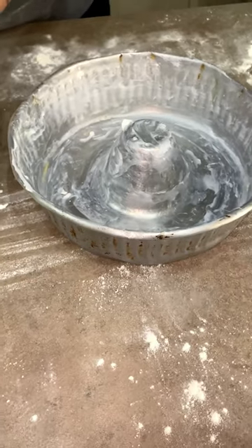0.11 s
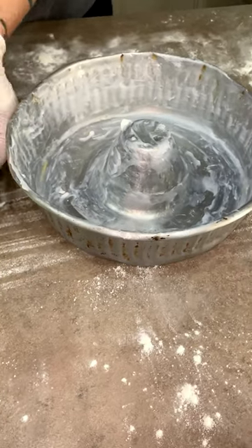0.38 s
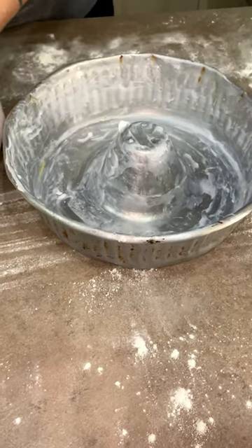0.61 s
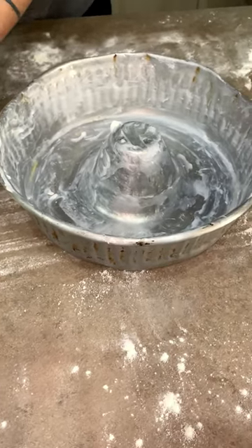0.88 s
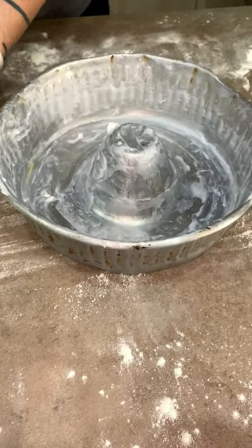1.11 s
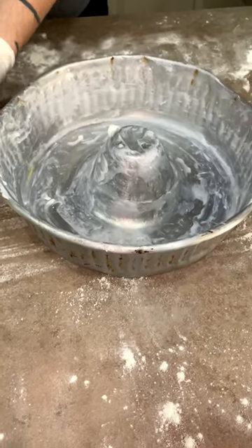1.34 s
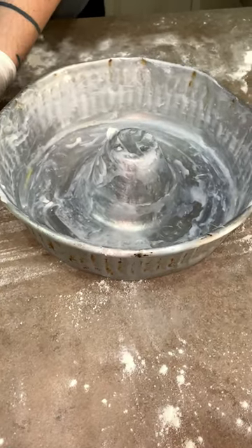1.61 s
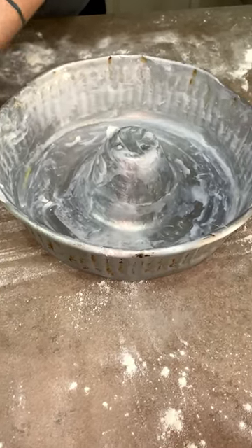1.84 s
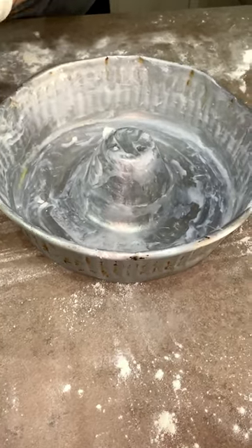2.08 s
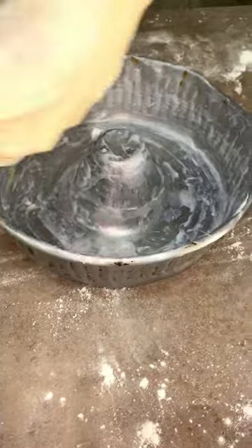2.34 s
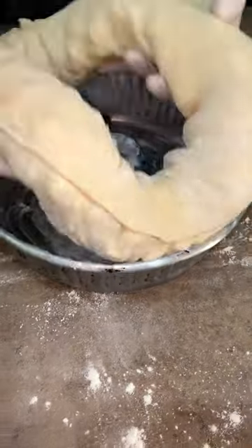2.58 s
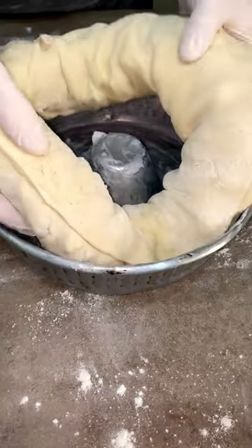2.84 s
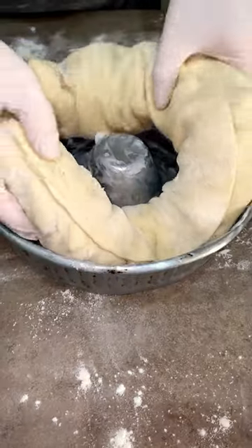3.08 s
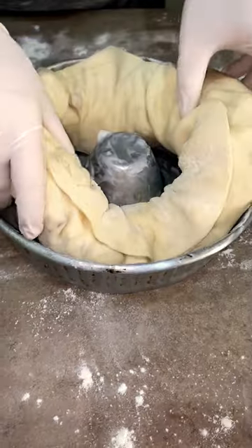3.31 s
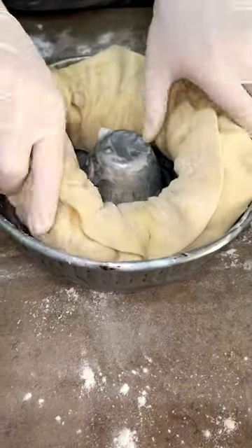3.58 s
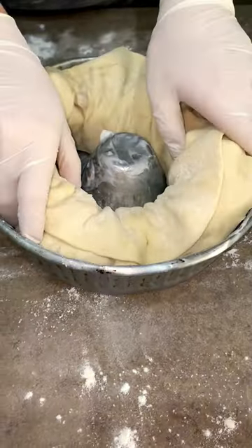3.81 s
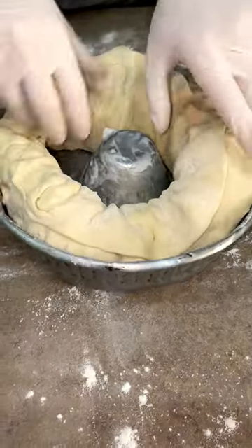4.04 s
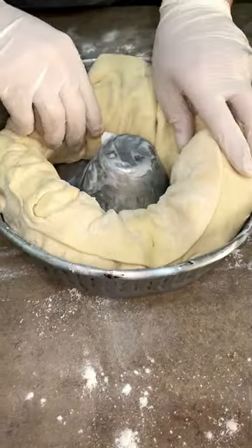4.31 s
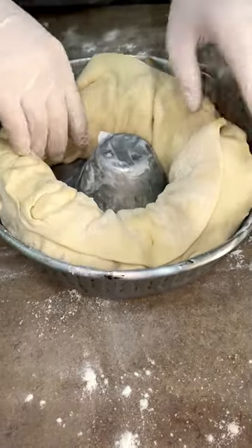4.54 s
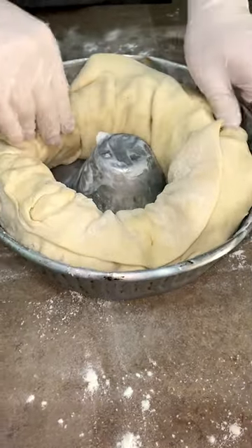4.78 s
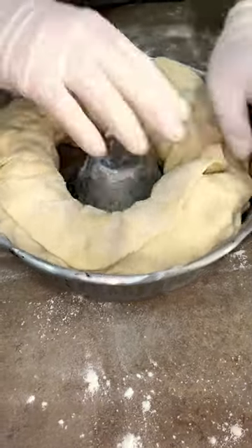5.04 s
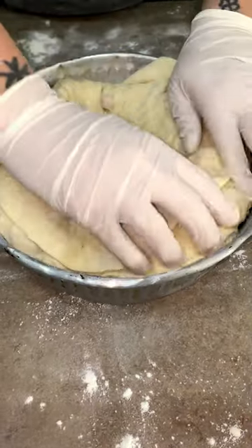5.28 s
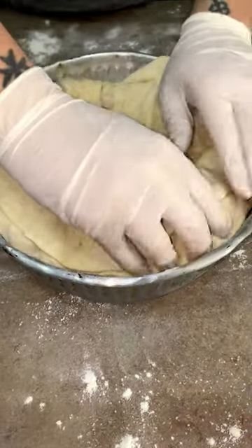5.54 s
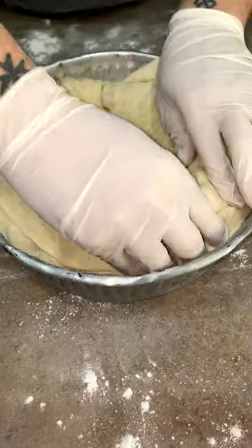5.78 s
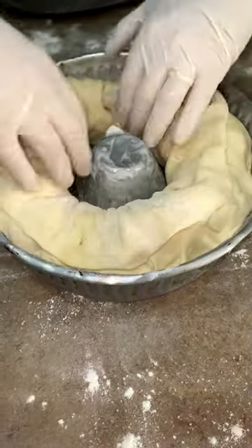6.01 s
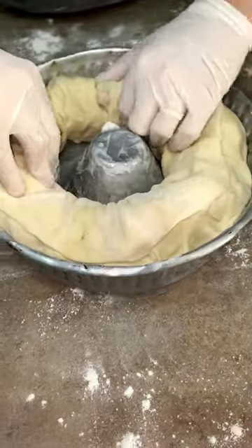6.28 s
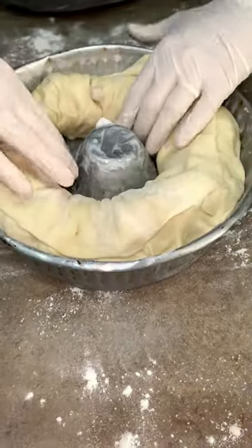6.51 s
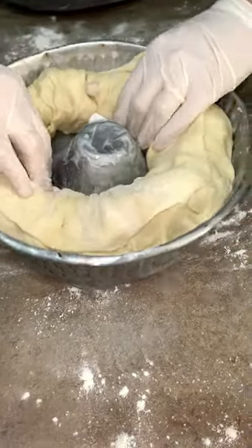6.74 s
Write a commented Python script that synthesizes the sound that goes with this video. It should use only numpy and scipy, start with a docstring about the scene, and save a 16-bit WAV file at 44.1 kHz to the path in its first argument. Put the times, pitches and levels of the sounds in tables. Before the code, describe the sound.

A small kitchen, heard closely in stereo, with a steady low appliance hum that throbs gently about twice a second. From 0 to 2 seconds gloves rustle softly on flour and dough, with dull bumps, deep table jolts and a couple of faint rubber clicks. Around 2 to 2.6 it nearly falls quiet. At 2.65 a rapid cluster of knocks peaks in a hollow, dry metallic clunk as dough drops into the thin mould, the loudest moment, with a scrape at 2.7. From 2.9 to 4.8 come short rubs, glove snaps, a tiny low creak near 3.3, and damped knocks at 3.5, 4.25 and 4.75. A strong dragging scuff swells at 5.0. Brighter tinny knocks follow at 5.4, 5.6 and 5.9, with rubbery clicks until 6.3. Quiet rubbing and faint taps continue to nearly 6.9. Hits leave a short room tail.

```python
"""Dull thumps and rustling gloves come first, over an appliance hum in a small kitchen, near a stereo microphone.
A dough ring is lifted off a floured table, dropped into a thin metal mould and pressed in by gloved hands.
Knocks are dying modes of mould and table top; gloves, flour and dragged dough are shaped noise that swells
with each stroke; glove snaps are short clicks, jolts are deep sways, and a short room tail follows the hits."""
import sys
import numpy as np
from scipy import signal
from scipy.fft import rfft, irfft
from scipy.io import wavfile
from scipy.ndimage import uniform_filter1d

SR = 44100
rng = np.random.default_rng(int(sys.argv[2]) if len(sys.argv) > 2 else 0)


def wrap_up_sound(samples):
    """Save the sound to the file named by the first command line argument, as 16-bit audio."""
    columns = np.atleast_2d(samples).T
    # keep every value between -1 and 1, then stretch to whole-number steps
    tamed = np.clip(columns, -1, 1)
    steps = np.round(tamed * 32767).astype(np.int16)
    wavfile.write(sys.argv[1], SR, steps)


def nominal_scale(level):
    """Amplitude ratio for a level in decibels (scalar or array-like)."""
    x = np.asarray(level, float) / 20
    return 10 ** x


N = 303408

# Still kitchen air, relative spectrum: (frequency [Hz], density [dB per Hz])
AIR_SPECTRUM = [(12, -52), (20, -20.5), (37, -31.5), (69, -19), (92, -3), (124, -20), (154, -4),
                (270, -6.5), (309, -3.5), (353, -13.5), (572, -12.5), (1310, -32.5), (12200, -70),
                (15800, -100), (22000, -120)]
# Appliance hum tones: (frequency [Hz], level before a 2 dB lift and the wavering [dB])
HUM_TONES = [(48.4, -68.5), (150.7, -65), (306.8, -67), (409.1, -76.5), (559.9, -78.5)]
# Likeness of the noise at the two microphones: (frequency [Hz], correlation [-1 to 1])
STEREO_LIKENESS = [(60, 0.99), (110, 0.74), (190, 1), (350, 0.8), (630, 0.22), (1120, 0.37), (2020, 0.72),
                   (3630, -0.21), (6530, 0.65), (11700, -0.85)]
# Side lean of the noise layers: (frequency [Hz], left minus right [dB])
NOISE_LEAN = [(60, 2.5), (170, 3), (500, 3.5), (1420, 1.5), (4080, -2.5), (11700, 1.5)]
# Decay of the room tail: (frequency [Hz], t60 [s])
ROOM_DECAY = [(150, 0.61), (500, 0.35), (1500, 0.23), (4000, 0.25), (10000, 0.25)]

# Jolts that shake the whole table: (time [s], level before doubling, onset and decay [dB])
JOLTS = [(0.568, -46), (0.899, -46), (1.229, -46), (1.561, -39), (2.674, -42.5), (3.013, -47.5),
         (4.234, -44.5), (4.599, -50), (4.767, -39.5), (5.079, -43), (5.359, -56), (5.651, -41),
         (5.929, -44), (6.169, -49), (6.299, -52.5)]
# The table frame's three lowest sways: (frequency [Hz])
FRAME_SWAYS_HZ = [44.6, 61.8, 79.9]
# A short low creak: (time [s], level [dB])
CREAK_LEVEL = [(3.245, -51), (3.26, -47.5), (3.295, -49.5), (3.316, -66)]

# Hand strokes over flour, dough and metal, levels before texture and resonance:
# (peak time [s], length [s], airy swish [dB], scrape [dB], drag on the mould [dB])
STROKES = [(0.052, 0.25, -68, -67, -66), (0.145, 0.35, -67.5, -70, -64), (0.346, 0.17, -57, -60, -61.5),
           (0.588, 0.2, -60, -60.5, -60), (0.726, 0.12, -57.5, -60, -58), (0.89, 0.11, -59.5, -60.5, -56.5),
           (1.058, 0.35, -60.5, -66.5, -62.5), (1.14, 0.05, -65, -58, -65.5),
           (1.25, 0.15, -71.5, -63.5, -56), (1.432, 0.13, -61, -63, -61),
           (1.574, 0.137, -64.0, -64.0, -57.5), (1.703, 0.16, -59.5, -64, -63.5),
           (1.834, 0.27, -65.5, -62, -66.5), (1.986, 0.075, -67.5, -63, -70),
           (2.232, 0.16, -81.0, -71.5, -61), (2.722, 0.1, -61.5, -48.5, -45),
           (2.809, 0.25, -67.5, -60.5, -50), (2.958, 0.063, -59, -58.5, -57),
           (3.046, 0.047, -65, -55.5, -64), (3.132, 0.031, -64.5, -56, -55.5),
           (3.246, 0.277, -63.5, -58.5, -55.5), (3.383, 0.086, -60, -59, -67),
           (3.492, 0.077, -68, -63.5, -73), (3.546, 0.065, -61, -60, -55), (3.65, 0.36, -64, -63, -58),
           (3.88, 0.09, -62.0, -55.5, -53.5), (4.045, 0.086, -58, -57.5, -52.5),
           (4.156, 0.062, -73.5, -74, -68), (4.236, 0.037, -61.5, -61, -60),
           (4.345, 0.18, -67.0, -61.5, -54), (4.611, 0.18, -65.5, -63.0, -60),
           (4.684, 0.072, -78, -63.5, -55.5), (4.83, 0.064, -66.5, -63, -60), (5.027, 0.17, -54, -49, -39),
           (5.21, 0.23, -66.5, -62.5, -63.5), (5.368, 0.033, -60, -54, -62),
           (5.422, 0.14, -65.5, -66.5, -51), (5.565, 0.083, -60.5, -58.5, -54),
           (5.667, 0.12, -66.5, -65, -56.5), (5.78, 0.091, -70.5, -65, -60.5),
           (5.925, 0.035, -53, -53.5, -72), (5.96, 0.14, -69.5, -66.5, -54.5),
           (6.086, 0.11, -69.5, -67, -61.5), (6.196, 0.079, -66.5, -66.5, -58),
           (6.357, 0.41, -67.5, -64, -61.5), (6.467, 0.047, -69, -61, -63), (6.53, 0.13, -67, -69, -73),
           (6.812, 0.18, -66.5, -60.5, -59.5), (6.868, 0.057, -66.5, -59.0, -54.5)]
# Levels between strokes: (swish [dB], scrape [dB], drag [dB])
STILL_DB = [-89, -88, -73]
# Weight of the hands on the table, as rumble before the drag adds its share: (time [s], level [dB])
HAND_WEIGHT = [(0.0, -56), (0.19, -64), (0.94, -60.5), (1.07, -56.5), (1.86, -61), (2.09, -74), (2.3, -75),
               (2.72, -63), (3.68, -63.5), (4.46, -58.5), (4.66, -57), (4.92, -63), (5.36, -59.5),
               (5.52, -60.5), (5.82, -58), (5.96, -61.5), (6.59, -60.5), (6.88, -60.5)]
# Resonance of the hollow under the hand: (time [s], frequency [Hz])
HAND_HOLLOW = [(0, 2450), (2.0, 2400), (2.7, 2200), (2.95, 2600), (3.3, 1850), (3.6, 2400), (4.1, 2550),
               (4.75, 2270), (5.0, 2740), (5.25, 2750), (5.4, 1900), (5.75, 2400), (5.98, 1900),
               (6.4, 2400), (6.88, 2600)]
# Resonance of the rubbed part of the mould wall: (time [s], frequency [Hz])
RUBBED_WALL = [(0, 700), (1.2, 780), (2.75, 685), (3.3, 760), (3.45, 680), (4.5, 727), (4.95, 915),
               (5.3, 790), (6.88, 830)]
# Relative spectra of airy swish, scrape, drag and table rumble: (frequency [Hz], density [dB per Hz])
SWISH_SPECTRUM = [(2120, -31), (3600, -11), (4050, -6), (4860, -10), (5990, -7.5), (6920, -11),
                  (11200, -14.5), (12200, -13), (15800, -65), (22000, -120)]
SCRAPE_SPECTRUM = [(820, -20.5), (1400, -7.5), (1830, -2.5), (2380, -9), (2800, -2), (3800, -7),
                   (4940, -39), (8360, -120)]
DRAG_SPECTRUM = [(180, -51), (300, -4.5), (387, -8), (561, -6.5), (725, -1), (975, -5), (1500, -10.5),
                 (1950, -41.5), (3300, -120)]
PUSH_SPECTRUM = [(12, -38), (20, -27.5), (59, 8), (125, -20), (189, -3.5), (400, -10), (520, -42),
                 (880, -120)]

# Glove snaps: (time [s], peak level before the lean [dB], left minus right [dB])
SNAPS = [(0.867, -42, -5), (1.667, -49, 3), (2.8848, -53, -4.5), (2.9382, -44, -1), (3.1272, -42, 8),
         (3.2314, -47.5, -3.5), (3.6157, -55, -1.0), (3.865, -51, -5), (4.1475, -48.5, -7),
         (4.6007, -46, 1.0), (5.5245, -43.5, -2), (5.6322, -41.5, -3.5), (5.752, -49, -16),
         (5.907, -49, -23), (6.0944, -48, 5), (6.2148, -44.5, 9), (6.3013, -44, 1)]
# Knocks: (time [s], peak level of the metal before the lean [dB], centre of the struck metal modes [Hz],
#          table thump before an 11 dB lift [dB], brightness before the offsets in knocks() [dB])
KNOCKS = [(0.062, -54.5, 665, 13.5, -23), (0.078, -55, 600, 13, -23), (0.111, -53.5, 581, 12.5, -21),
          (0.573, -37.5, 840, 5.5, -25), (0.701, -32, 660, -13, -27), (0.832, -39, 660, -23, -32),
          (0.845, -35, 684, 0, -30), (0.985, -40, 670, -6, -22), (1.205, -47, 567, 6, -1),
          (1.237, -33, 1010, -24, -19), (1.525, -35.5, 630, 0.5, -35), (1.577, -34, 600, -36, -13),
          (2.641, -33, 635, -28, -15), (2.65, -18, 643, -23, -27), (2.658, -17, 645, -11.5, -23),
          (2.667, -15, 624, -49, -18.5), (2.671, -5.5, 640, -23.5, -14), (2.677, -9, 744, -22.5, -5.5),
          (2.746, -29, 690, -32, -30), (2.76, -32.5, 645, -23, -35), (2.874, -26.5, 684, -30, -11.5),
          (2.934, -44.5, 802, 0, -4), (3.009, -36.5, 634, -1.5, -8.5), (3.054, -36.5, 520, -27, -20),
          (3.127, -43, 680, -23, -5), (3.176, -41.5, 837, -15, 1), (3.338, -28, 735, -21.5, -25),
          (3.357, -41, 700, -16, 4), (3.39, -36.5, 649, -32, -13), (3.526, -24.5, 640, -21.5, -18),
          (4.033, -41, 654, -9, -6), (4.226, -33, 670, -5.5, -8), (4.239, -22.5, 680, -16, -15),
          (4.267, -25.5, 730, -21, -7.5), (4.703, -37.5, 1040, -32, -22), (4.751, -28.5, 1040, -38, -19),
          (4.767, -32, 845, -13, -16), (5.369, -21.5, 1280, -28, -16), (5.372, -27.5, 985, -13.5, -36),
          (5.468, -43, 715, -8, -5), (5.568, -22.5, 830, -23, -9.5), (5.585, -32, 910, -9, -20),
          (5.65, -18.5, 724, -18, -45), (5.925, -21, 920, -18.5, -11), (5.943, -26, 1080, -15, -10),
          (6.45, -45, 970, -23, -2), (6.532, -44.5, 1310, -1, 0)]
# Modes of the free mould: (frequency [Hz], relative level [dB], t60 before damping [s])
MOULD_MODES = [(480, 2.5, 0.033), (525, -13, 0.12), (635, 6.5, 0.028), (695, -5, 0.066), (802, -3, 0.066),
               (879.5, -7.5, 0.074), (1029, -5, 0.065), (1147, 1, 0.045), (1247, -15, 0.05),
               (1430, 1.5, 0.016), (1570, -13, 0.024), (1850, -9, 0.034), (2077, -5, 0.03),
               (2270, 8.5, 0.015), (2362, -9.5, 0.044), (2540, -11.5, 0.037), (2550, -20.5, 0.027),
               (3182, -19, 0.025), (3195, -20.5, 0.071), (3500, -10, 0.007)]
# Modes of the table top: (frequency [Hz], relative level [dB], t60 before damping [s])
TABLE_MODES = [(133.3, -11.5, 0.45), (194.1, 2, 0.18), (249.5, 1.5, 0.092), (290.4, -0.5, 0.084),
               (396.5, -1.5, 0.14)]
# The mould rings freely as the dough lands and is damped as it is pressed in:
# (time [s], looseness [free metal 1, held or under dough less])
MOULD_LOOSENESS = [(0, 0.47), (.9, .55), (1.2, 0.33), (2.5, 0.95), (2.63, 0.9), (2.9, 0.7), (3.3, .45),
                   (4.3, 0.29), (5.3, 0.42), (5.6, 0.34), (6.88, .3)]
# Side lean of the knocks: (frequency [Hz], left minus right [dB])
KNOCK_LEAN = [(150, -0.6), (600, 5.5), (2500, -2.3), (6000, -5.5)]


def evened(x):
    """Scales to rms 1."""
    return x / np.sqrt(np.mean(x ** 2) + 1e-20)


def read(points, hz):
    """Reads a spectrum on a log frequency axis."""
    f, value = np.transpose(points)
    return np.interp(np.log(hz + 1), np.log(f + 1), value)


def curve(points):
    """Draws a table of (time [s], value) over the whole scene."""
    return np.interp(np.arange(N) / SR, *np.transpose(points))


def add(mix, s, sound):
    """Mixes a sound in at a time in seconds."""
    part = mix[..., round(s * SR):][..., :sound.shape[-1]]
    part += sound[..., :part.shape[-1]]


def noise(spectrum, size, patchy_db, flicker_db):
    """Stereo noise of rms 1 from random short-time spectra, with patches and wide-band flicker."""
    hop, hz = size // 4, np.fft.rfftfreq(size, 1 / SR)
    a, b, c, d, patches = rng.standard_normal((N // hop + 5, len(hz), 5)).T
    patches = uniform_filter1d(patches, size=size // 64, axis=0)
    patches = evened(uniform_filter1d(patches, size=4096 // size, axis=1))
    flicker = evened(uniform_filter1d(patches.mean(0), size=2))
    same = np.clip(read(STEREO_LIKENESS, hz), -1, 1)[:, None]
    lean = nominal_scale(read(NOISE_LEAN, hz) / 2)[:, None]
    left, other = a + 1j * b, c + 1j * d
    right = same * left + np.sqrt(1 - same ** 2) * other
    spectra = np.array([left * lean, right / lean])
    spectra *= nominal_scale(read(spectrum, hz)[:, None] + patchy_db * patches + flicker_db * flicker)
    return evened(signal.istft(spectra, nperseg=size, noverlap=size - hop)[1][:, :N])


def grains(per_s, spread_db, length_s):
    """A lumpy envelope: sparse slips of random size that start sharply and die fast."""
    size = nominal_scale(spread_db * np.minimum(rng.exponential(1, N), 4))
    slips = size * (rng.random(N) < per_s / SR)
    return evened(signal.lfilter([1], [1, -np.exp(-1 / (length_s * SR))], slips))


def resonate(x, hz, width_hz):
    """A moving resonance: shifts the curve hz down to zero, smooths, and shifts back."""
    turn = np.exp(2j * np.pi * np.cumsum(hz) / SR)
    r = np.exp(-np.pi * width_hz / SR)
    smooth = signal.lfilter([1 - r], [1, -r], x / turn)
    return evened((turn * smooth).real)


def ring(modes, weight_db, scatter_db, loose, t):
    """Dying modes that start together, each struck a little differently every time; peak 1."""
    hz, db, t60 = np.transpose(modes)[:, :, None]
    luck, detune = rng.standard_normal((len(modes), 2)).T[:, :, None]
    level = nominal_scale(db + weight_db + scatter_db * luck - 60 * t / (t60 * loose))
    out = (level * np.sin(2 * np.pi * hz * (1 + 0.023 * detune) * t)).sum(0)
    return out / abs(out).max()


def kitchen():
    """Still air as steady noise, and the slightly wavering hum tones of an appliance."""
    t = np.arange(N) / SR
    hum = np.zeros(N)
    for hz, db in HUM_TONES:
        waver_db = 3.9 * np.sin(2 * np.pi * (rng.uniform(0.57, 1.624) * t + rng.random()))
        hum += nominal_scale(db + 2 + waver_db) * np.sin(2 * np.pi * (hz * t + rng.random()))
    return nominal_scale(-59) * noise(AIR_SPECTRUM, size=2048, patchy_db=.3, flicker_db=.2) + hum


def throb():
    """One low hum tone swells and fades evenly, as if two close tones beat."""
    tone_hz, level_db = 102, -60.5
    beats_per_s, beat_peak_s, depth = 2.07, 2.475, 0.59
    t = np.arange(N) / SR
    swell = 1 + depth * np.cos(2 * np.pi * beats_per_s * (t - beat_peak_s))
    return nominal_scale(level_db) * swell * np.sin(2 * np.pi * (tone_hz * t + rng.random()))


def room(x):
    """Sparse taps of random sign, each band dying at its own speed, partly alike at both microphones."""
    taps = np.zeros((2, SR // 2))
    # one tap at a random place in every 20 samples
    at = np.arange(200, SR // 2 - 20, 20) + rng.integers(0, 20, (2, (SR // 2 - 201) // 20))
    np.put_along_axis(taps, at, rng.choice([-1., 1.], at.shape), 1)
    hz, t, z = signal.stft(taps, SR, nperseg=256)
    same = np.clip(read(STEREO_LIKENESS, hz), -1, 1)[:, None]
    z[1] = same * z[0] + np.sqrt(1 - same ** 2) * z[1]
    decay = nominal_scale(-60 * t / read(ROOM_DECAY, hz)[:, None])
    tail = signal.istft(z * decay, SR, nperseg=256)[1]
    return signal.fftconvolve(x.mean(0)[None], tail / np.linalg.norm(tail[0]), axes=1)[:, :N]


def jolts():
    """The table frame sways for a moment after a jolt: a few deep modes, a little different every time."""
    rise_s, t60_s, detune_share = 0.015, 0.47, .08
    out, t = np.zeros(N), np.arange(SR // 2) / SR
    luck = rng.standard_normal((len(JOLTS), len(FRAME_SWAYS_HZ), 1))
    for (s, db), detune in zip(JOLTS, luck):
        hz = np.array(FRAME_SWAYS_HZ)[:, None] * (1 + detune_share * detune)
        sway = np.sin(2 * np.pi * hz * t).mean(0)
        onset = 1 - np.exp(-t / rise_s)
        add(out, s, nominal_scale(db - 60 * t / t60_s) * onset * 2 * sway)
    return out


def creak():
    """A brief low tone under the pressing hands, slightly rough because it is narrow noise."""
    s, db = np.transpose(CREAK_LEVEL)
    level = nominal_scale(np.interp(np.arange(N) / SR, s, db, -120, -120))
    return level * resonate(rng.standard_normal(N), np.full(N, 274), width_hz=25)


def strokes():
    """Levels in dB of swish, scrape and drag: each stroke is a bell-shaped swell, overlaps add in power."""
    rise_share, edge_db = 0.44, -6  # share of the length spent swelling; level at the two ends
    s, length, *db = np.transpose(STROKES)
    t = np.arange(0, N / SR + .01, .002)
    u = (t[:, None] - s) / length
    bell = nominal_scale(edge_db * (u / np.where(u < 0, rise_share, 1 - rise_share)) ** 2)
    power = nominal_scale(np.array(db)) ** 2 @ bell.T ** 2
    power += nominal_scale(np.array(STILL_DB))[:, None] ** 2
    return [curve(np.transpose([t, 10 * np.log10(p)])) for p in power]


def hands():
    """Gloves swish and scrape on flour, dough drags on metal in small slips, pressure rumbles in the table."""
    swish_db, scrape_db, drag_db = strokes()
    # a harder drag also pushes harder: 0.43 dB per dB above -67.5
    push_db = curve(HAND_WEIGHT) + 0.43 * (drag_db + 67.5)
    crackle = 1.326 + .25 * grains(per_s=100, spread_db=6.2, length_s=0.00078)
    swish = crackle * noise(SWISH_SPECTRUM, size=256, patchy_db=1.84, flicker_db=0.96)

    scrape = crackle * noise(SCRAPE_SPECTRUM, size=256, patchy_db=1.5, flicker_db=1.55)
    # the hollow under the hand colours the scrape
    scrape = 0.73 * scrape + 0.49 * resonate(scrape, curve(HAND_HOLLOW), width_hz=380)

    slips = 1.0 + 0.38 * grains(per_s=500, spread_db=4.5, length_s=0.0047)
    drag = slips * noise(DRAG_SPECTRUM, size=512, patchy_db=3.85, flicker_db=0.1)
    # the part of the wall that is rubbed sings along
    drag = 0.71 * drag + 0.27 * resonate(drag, curve(RUBBED_WALL), width_hz=200)

    push = noise(PUSH_SPECTRUM, size=2048, patchy_db=2.7, flicker_db=4.7)
    return nominal_scale(swish_db) * swish + nominal_scale(scrape_db) * scrape + nominal_scale(drag_db) * drag + nominal_scale(push_db) * push


def snaps():
    """Rubber creases let go with a bright click: a fast-dying burst of band-passed noise."""
    out, t = np.zeros((2, N)), np.arange(600) / SR
    band = signal.butter(2, [2500, 9000], "bandpass", fs=SR)
    for s, db, pan_db in SNAPS:
        click = signal.lfilter(*band, rng.standard_normal(len(t)) * np.exp(-t / 0.0015))
        sides_db = db + np.array([[pan_db], [-pan_db]]) / 2
        add(out, s, nominal_scale(sides_db) * click / abs(click).max())
    return out


def knocks():
    """Each knock is a short rattling contact that rings the mould near its centre pitch and thumps the table."""
    out, t = np.zeros(N), np.arange(SR // 4) / SR
    modes_hz = np.array(MOULD_MODES)[:, :1]
    band = signal.butter(2, [3000, 7500], "bandpass", fs=SR)
    bass_cut = signal.butter(2, 280, "highpass", fs=SR)  # the ringing metal is cut below 280 Hz
    for s, db, hz, thump_db, bright_db in KNOCKS:
        rattle, hiss = rng.standard_normal((len(t), 2)).T
        loose = np.clip(np.interp(s, *np.transpose(MOULD_LOOSENESS)), .15, 1.6)
        fade = np.exp(-t / (0.0052 * loose))
        contact = fade * (rattle > 2.1) * 0.18  # rare small touches after the first
        contact[0] = 1
        # low modes ring most near the struck pitch, brightness sets the high ones
        weight_db = np.where(modes_hz < 1500, -13 * abs(np.log2(modes_hz / hz)), bright_db + 3.5)
        metal = signal.fftconvolve(contact, ring(MOULD_MODES, weight_db, 3.36, loose, t))[:len(t)]
        metal *= (1 - np.exp(-t / 0.00085)) ** 2  # dough and gloves soften the first touch
        metal = signal.lfilter(*bass_cut, metal)
        metal /= abs(metal).max()
        tick = fade * signal.lfilter(*band, hiss)
        thump = ring(TABLE_MODES, 0, 0.65, 0.77, t) * (1 - np.exp(-t / 0.0012))
        add(out, s, nominal_scale(db) * (metal + nominal_scale(thump_db + 11) * thump + nominal_scale(bright_db - 12.5) * tick))
    lean = nominal_scale(read(KNOCK_LEAN, np.fft.rfftfreq(N, 1 / SR)) / 2)
    return irfft(rfft(out) * np.array([lean, 1 / lean]), N)


def scene():
    """Near hits with their room tail, over hands and kitchen."""
    background = kitchen() + throb()
    handling = jolts() + creak() + hands()
    hits = snaps() + knocks()
    return background + handling + hits + nominal_scale(-8) * room(hits)


def top_cut(x):
    """Nothing passes above the cut-off."""
    return signal.sosfilt(signal.butter(12, 12330, fs=SR, output="sos"), x)


def record(dry):
    """The microphone drops the deepest bass, below 35 Hz."""
    heard = signal.lfilter(*signal.butter(2, 35, "highpass", fs=SR), dry)
    return top_cut(heard)


dry = scene()
out = record(dry)
wrap_up_sound(out)
```